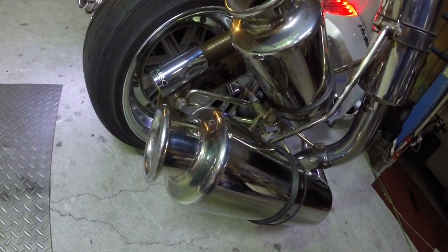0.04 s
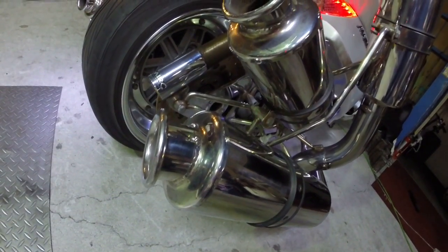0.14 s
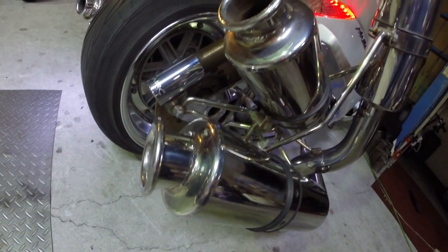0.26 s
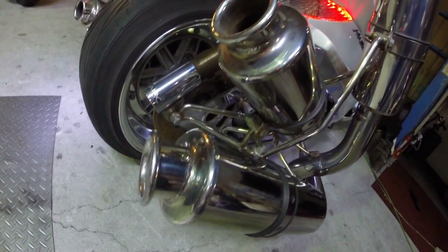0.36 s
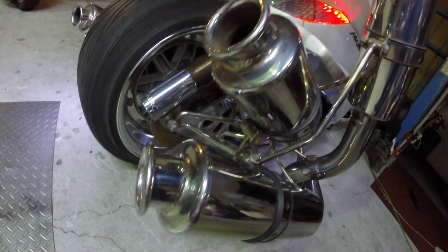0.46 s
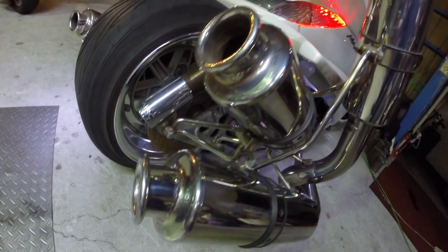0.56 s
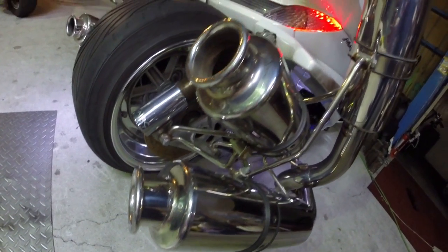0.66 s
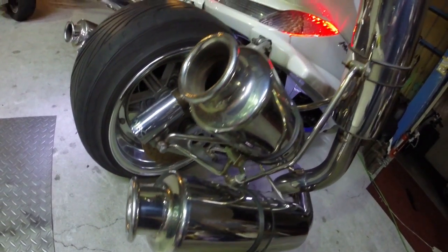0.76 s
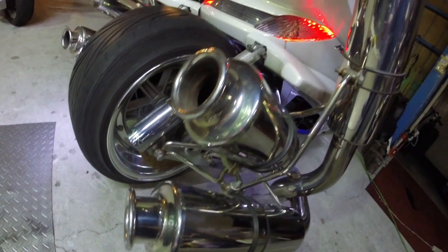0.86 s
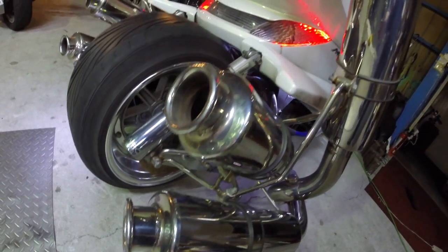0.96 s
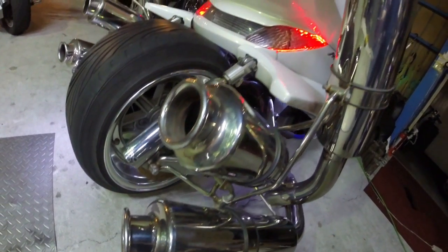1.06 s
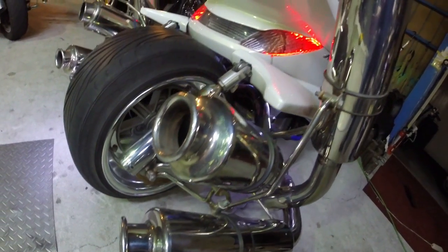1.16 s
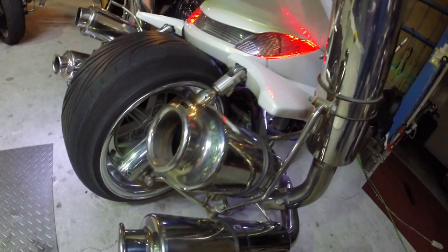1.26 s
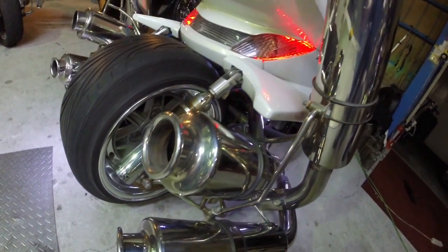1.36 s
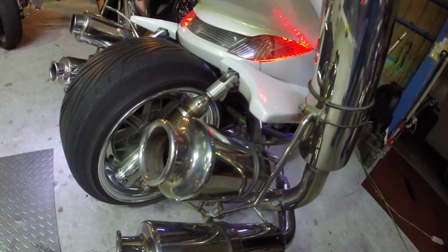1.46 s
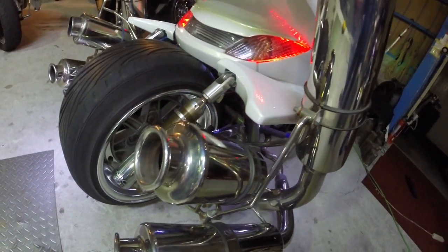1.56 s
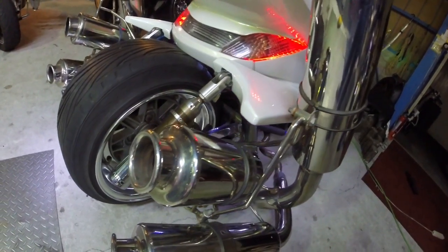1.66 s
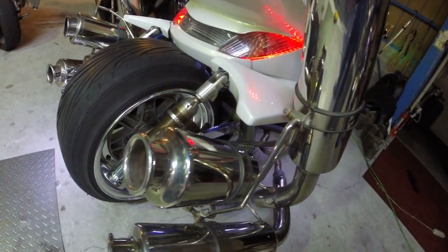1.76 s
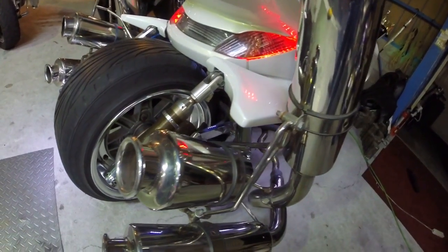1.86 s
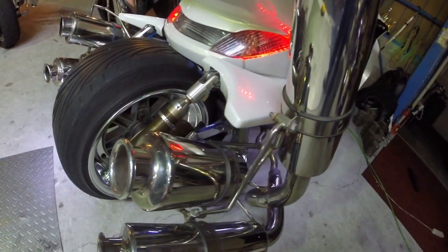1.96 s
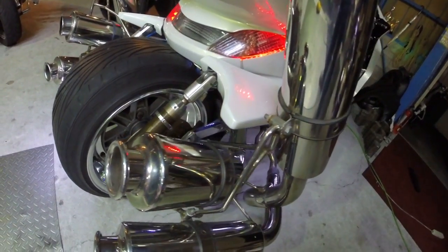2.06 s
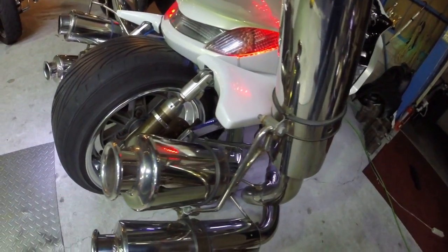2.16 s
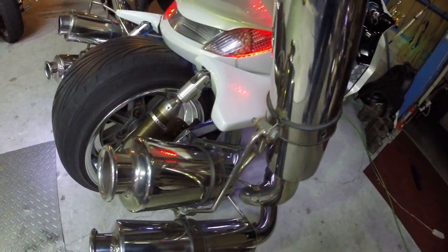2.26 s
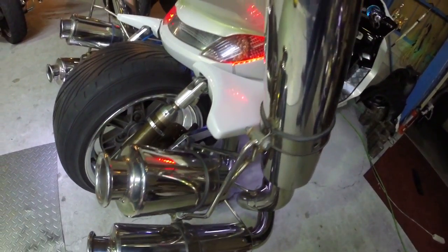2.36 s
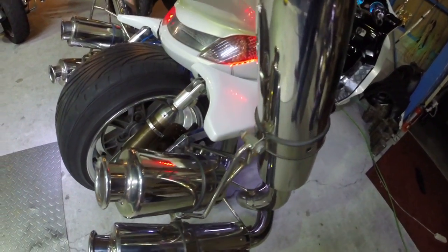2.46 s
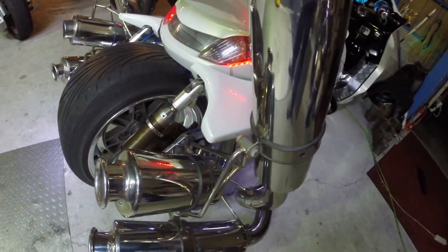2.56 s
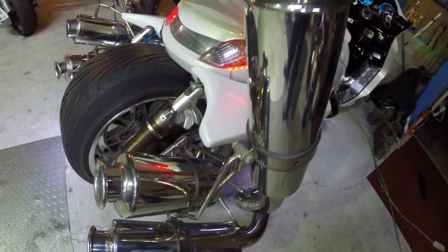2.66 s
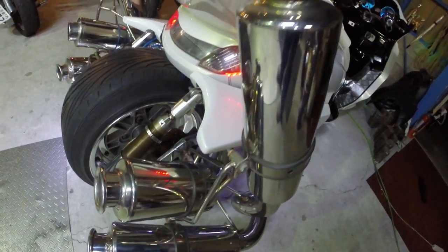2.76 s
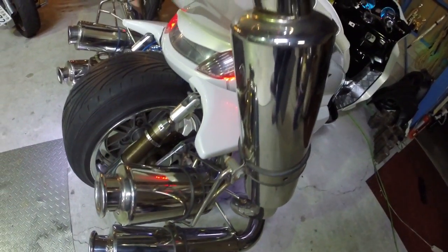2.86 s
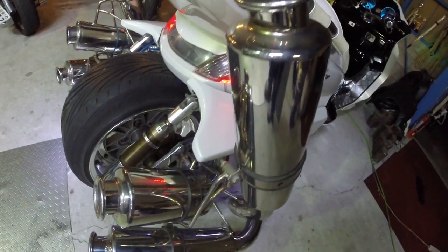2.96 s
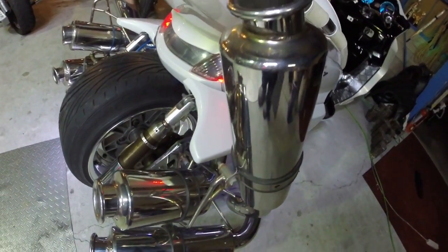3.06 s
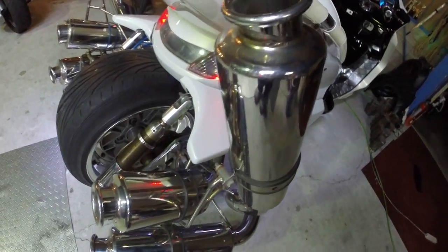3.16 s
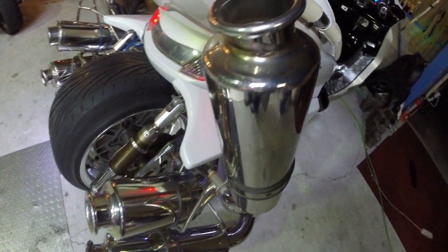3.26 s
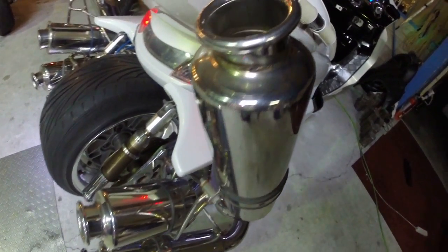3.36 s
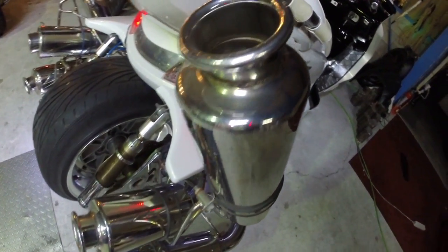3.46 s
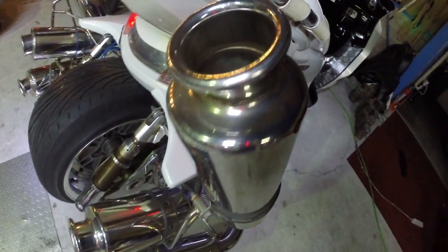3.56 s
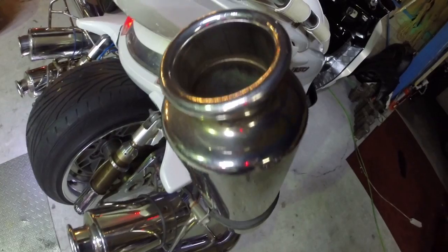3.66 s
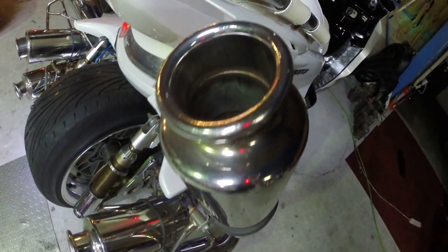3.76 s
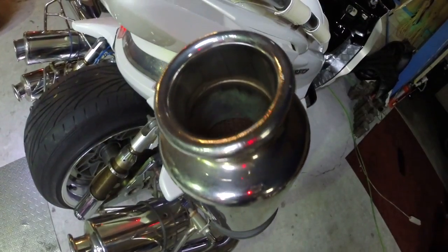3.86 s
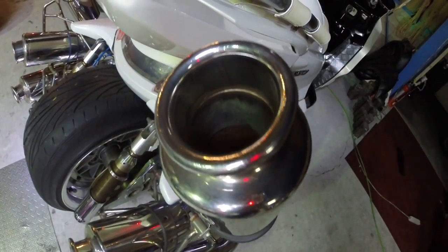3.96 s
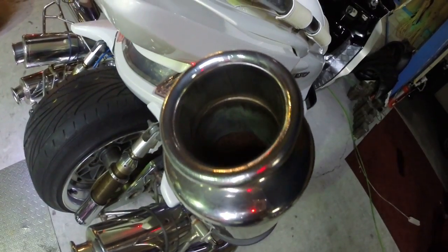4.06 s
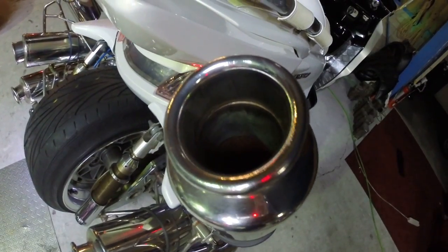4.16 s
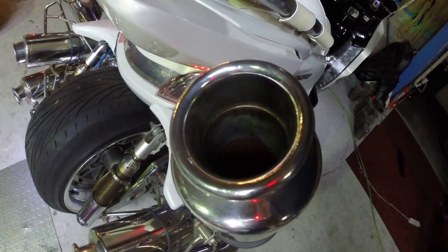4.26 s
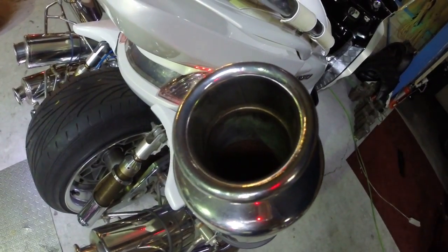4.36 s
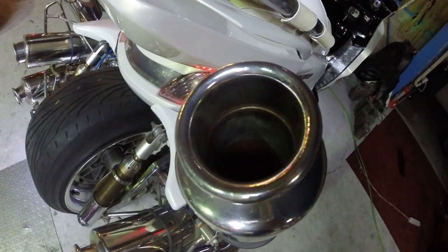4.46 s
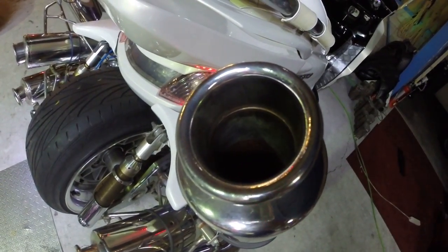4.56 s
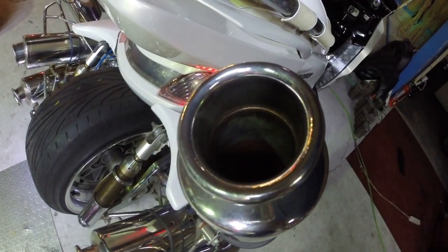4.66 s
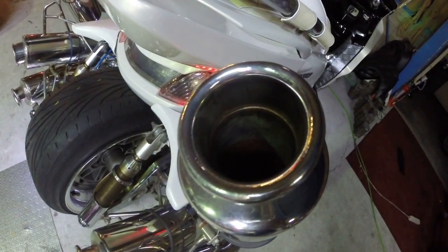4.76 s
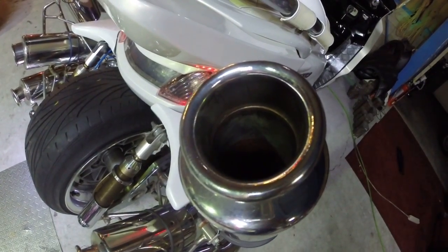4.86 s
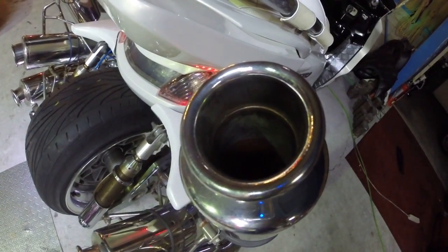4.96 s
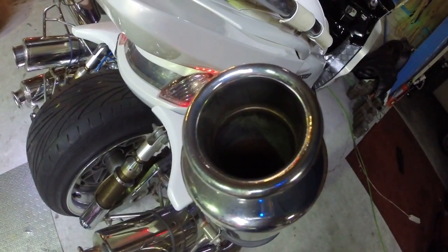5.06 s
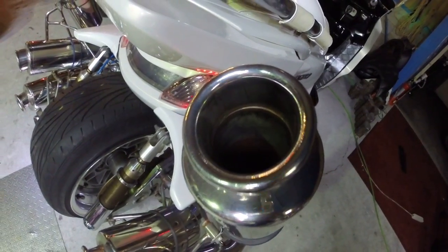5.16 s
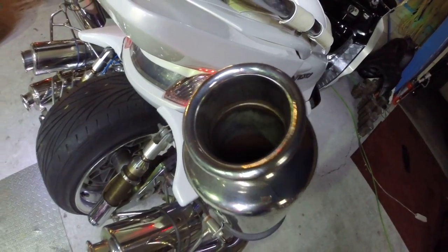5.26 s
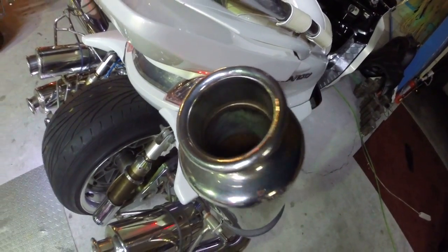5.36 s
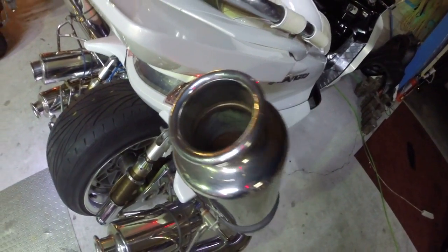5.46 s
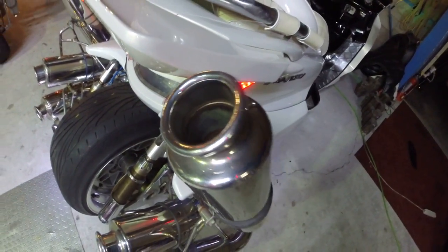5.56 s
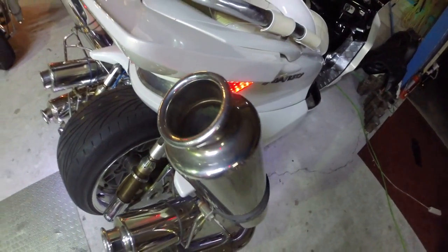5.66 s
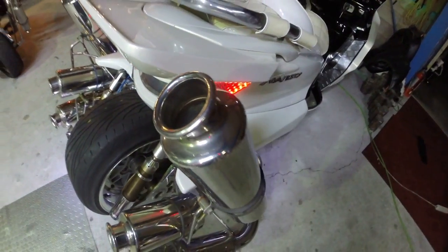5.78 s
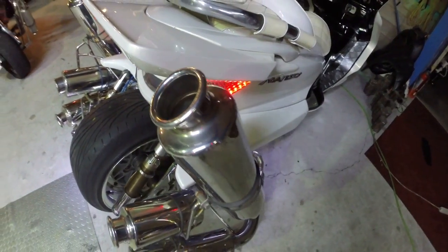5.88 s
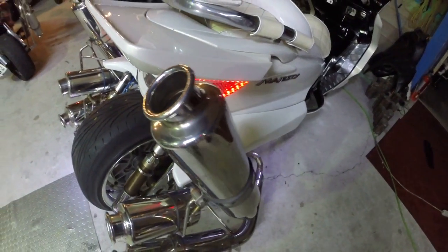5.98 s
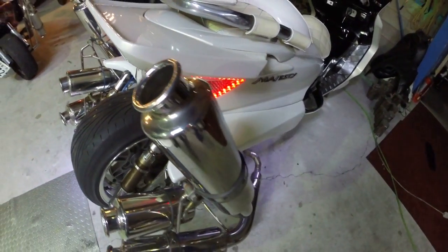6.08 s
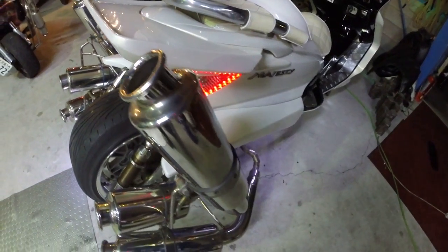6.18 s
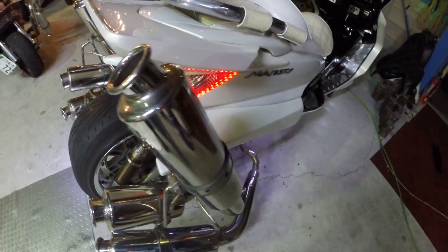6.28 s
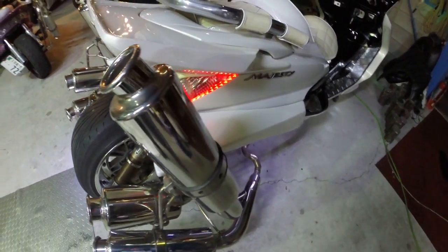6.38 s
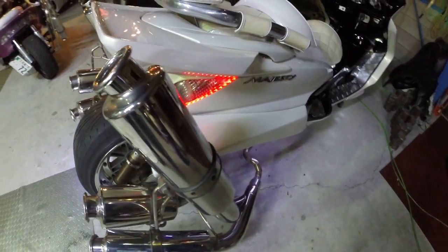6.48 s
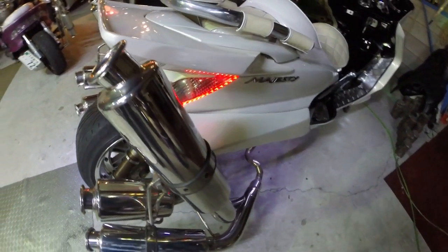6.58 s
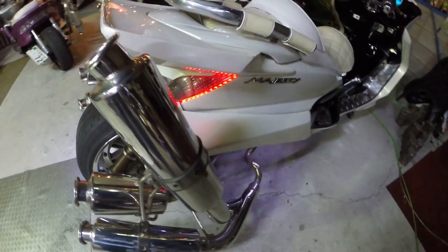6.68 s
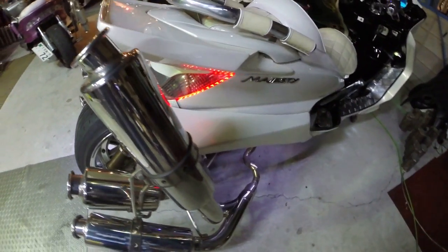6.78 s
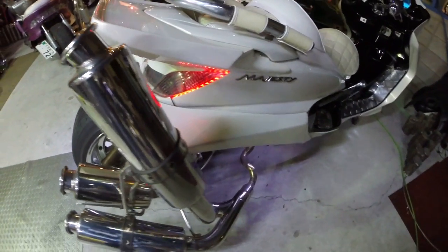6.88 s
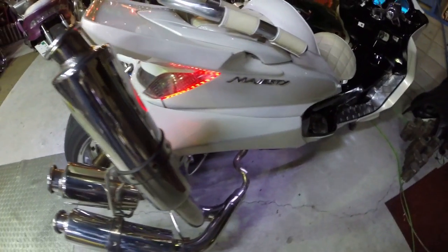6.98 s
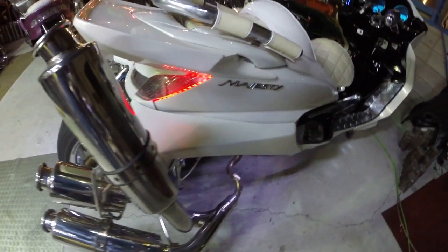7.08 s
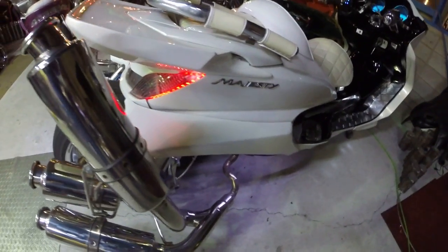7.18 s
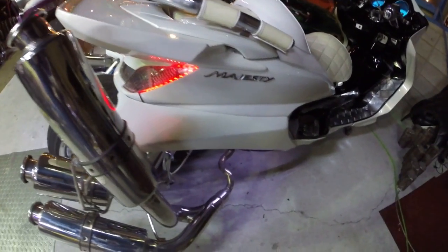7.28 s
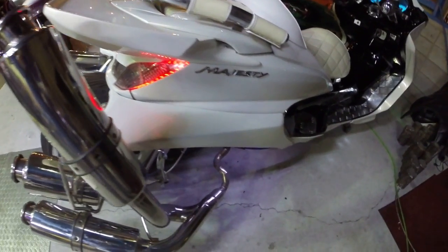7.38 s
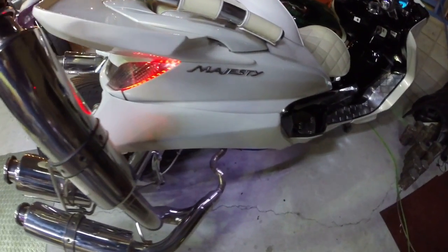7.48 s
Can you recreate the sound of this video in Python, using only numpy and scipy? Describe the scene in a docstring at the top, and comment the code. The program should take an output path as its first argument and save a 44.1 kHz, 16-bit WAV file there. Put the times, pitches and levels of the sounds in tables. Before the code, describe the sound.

Deep, quick, slightly uneven exhaust pulses from an idling scooter in a hard-floored workshop, heard by a handheld camera microphone. At first boomy and clattery, they become throaty and loud by the middle, with small bright spits of gas, then retreat. A low reverberant wash, thin airy hiss, faint high electronic whine and deep handling rumble lie beneath; one dry hollow knock comes late.

```python
"""A single-cylinder scooter idles in a workshop, clattering over a low wash, a hiss and a faint camera whine.
From the start each firing rings the exhaust pipe and silencer, and arrives again by a wall, unevenly strong.
The hand-held camera drifts towards the exhaust mouth: the bark grows until about 3.9 s, with sharp gas spits.
Then it moves away and the bark fades; at about 7.1 s something hollow knocks once near the camera.
Pushes and noise through resonances make all the sounds except the whine, which is a switched tone."""
import sys
import numpy as np
from scipy import signal
from scipy.fft import rfft, irfft
from scipy.io import wavfile
from scipy.ndimage import uniform_filter1d

SR = 44100
rng = np.random.default_rng(int(sys.argv[2]) if len(sys.argv) > 2 else 0)


def wrap_up_sound(samples):
    """Save the sound to the file named by the first command line argument, as 16-bit audio."""
    columns = np.atleast_2d(samples).T
    # keep every value between -1 and 1, then stretch to whole-number steps
    tamed = np.clip(columns, -1, 1)
    steps = np.round(tamed * 32767).astype(np.int16)
    wavfile.write(sys.argv[1], SR, steps)


N = 332073  # length in samples

# Idle speed, wandering a little: [t/s, speed/rpm]
SPEED = [(0, 1334.5), (.75, 1393.3), (1.65, 1359.1), (2.55, 1427.9), (3.0, 1446.9), (3.9, 1580.3),
         (4.05, 1479.5), (4.5, 1508.6), (5.05, 1512.3), (5.55, 1445.1), (5.9, 1308.8), (6.35, 1393.6),
         (7.15, 1397.0), (7.53, 1344.2)]
FIRST_FIRING_S = 0.018

# Exhaust resonances, level within each group: [f/Hz, width/Hz, level/dB, sign and size at the mouth]
# lowest modes of the long pipe
BOOM = [(74.1, 16.25, 2.21, -0.78), (101.26, 17.3, -4, -0.66)]
# silencer volume
THUD = [(106.93, 47.26, 1.44, 0.931), (135.55, 4.6, -15, -1.02)]
# upper pipe modes, beamed from the mouth
BARK = [(125.4, 3.5, -10.5, 0.37), (191.6, 27, -14.5, -1.18), (334.2, 47, 1.5, 0.85), (369.2, 29, -3, 1),
        (490, 140, -15.5, -0.96), (670, 42, -24, 0.91)]
# silencer cans
SHELL = [(218.3, 15.5, 0, 1), (313.4, 13.2, -2, 0.96), (387.4, 76.3, -5, 0.92), (426, 33, -16, -1.34)]
# hollow rings of three tail cans, each heard from its own side
HOLLOW = [(572, 25, 2.4, 0.87), (632, 9.2, 0.81, -1.96), (774, 39, -1, 0.71)]
# Time constant of each group's push, both rising and falling
BOOM_PUSH_S, THUD_PUSH_S, BARK_PUSH_S, SHELL_PUSH_S, HOLLOW_PUSH_S = 0.00055, 0.00071, 0.0052, 0.00028, 0.00012
VOLUME_DB, CANS_DB = -8, -22  # silencer volume and cans, counted from the lowest pipe modes

# Pulse travel, tail cans (counted from the lowest pipe modes), and the second arrival of each thump,
# unevenly strong (counted from the direct sound): [t/s, pulse travel/s,
# first, second and third tail can level/dB, second arrival level/dB, second arrival lag/s]
PLACE = [(.3, .0049, -34.5, -44, -50, -16, 0.029), (.9, 0.0049, -40, -34.5, -48, -18, 0.029),
         (1.9, 0.0036, -41, -34.5, -57, -11, .029), (2.5, 0.0024, -36, -34.5, -42, -32, 0.0277),
         (3.3, .00214, -47, -41, -34.5, -10.5, 0.023), (4.5, 0.0025, -55, -45, -38, -15.5, 0.023),
         (5.7, 0.0023, -52, -46, -39.5, -34, 0.0293), (6.4, 0.0022, -36, -40, -44, -12.5, .029),
         (7.3, 0.0031, -47, -50, -48, -13, 0.02775)]
# As the camera nears the mouth and leaves:
# [t/s, lowest pipe modes level/dB, upper modes level/dB, gas spit level/dB, clack level/dB]
NEARNESS = [(.1, 18.5, -42, -54, -52), (.5, 19, -30, -54, -49), (.9, 19, -5, -59, -47),
            (1.4, 19, -1, -57, -48), (2.1, 19, 4, -58, -51.5), (2.9, 18.5, 7.5, -61, -52.5),
            (3.45, 20, 10, -59, -55), (3.92, 23, 14, -53, -48.5), (4.6, 22.5, 12.5, -50, -52.5),
            (5.2, 22.5, 12.5, -49, -49.5), (5.6, 19.7, 8.5, -59, -50), (5.97, 16.5, 5, -60, -56.5),
            (6.6, 15.5, 3.5, -58, -57.5), (7.4, 13, .5, -63, -62)]
# Random spread, either way
FIRING_SCATTER_DB, SPIT_SCATTER_DB, CLACK_SCATTER_DB = 0.45, 4, 5.5

# Modes that each firing strikes in the engine cases: [f/Hz, width/Hz, level/dB]
CLACK = [(1550, 260, 0), (2570, 730, 2.5), (3264, 470, 0), (5030, 3400, -4.5)]
# Some hard clacks, each setting the level of one mode: [t/s, mode f/Hz, level/dB]
HARD_CLACKS = [(.022, 2600, -41.5), (.289, 2600, -42), (.289, 3300, -35.5), (.378, 3300, -37.5),
               (.465, 5000, -44), (.639, 2600, -45), (.726, 2600, -37), (.898, 3300, -42),
               (.985, 2600, -43.5), (1.333, 2600, -41), (1.509, 1530, -45), (1.597, 2600, -40),
               (1.947, 1530, -40.5), (2.121, 2600, -40), (2.629, 3300, -41), (2.881, 3300, -45),
               (3.372, 2600, -40), (3.452, 1530, -40.5), (3.53, 1530, -42), (3.917, 1530, -40),
               (3.917, 2600, -42.5), (4.075, 1530, -43), (4.635, 2600, -44), (4.875, 2600, -42),
               (5.033, 2600, -41), (5.192, 2600, -41), (5.354, 2600, -40), (5.437, 3300, -44),
               (5.518, 2600, -43), (5.686, 2600, -44)]

# Resonances of the engine cases, relative levels: [f/Hz, width/Hz, level/dB]
CASES = [(1146, 180, -7.5), (1533, 148, 1), (2625, 230, -1.5), (3316, 410, -3.5), (4250, 720, -8),
         (5867, 770, -6.5)]
# Smooth spectrum between those peaks, relative levels per Hz: [f/Hz, level/dB]
CASE_BED = [(250, -3), (500, -1.5), (900, -13.5), (2000, -8), (3500, -11.5), (5000, -23.5), (6500, -18),
            (8500, -26.5), (10800, -29.5), (13500, -33.5), (15000, -50)]
# Running clatter, before the swells lift it: [t/s, level/dB]
CLATTER = [(0, -48.5), (1.7, -48.5), (2.0, -49.5), (5.5, -50), (6.0, -52), (7.2, -50), (7.53, -50)]

# Some sharp gas spits, each setting the level of one firing's spit: [t/s, level/dB]
HARD_SPITS = [(3.688, -49), (3.995, -49), (4.156, -47), (4.477, -44), (4.635, -41.5), (4.715, -47),
              (4.875, -46.5), (5.112, -49.5)]

# The knock: [t/s, blow level/dB]
KNOCKS = [(7.0905, -5.5)]
# Resonances of the hollow thing knocked: [f/Hz, width/Hz, level/dB]
KNOCK_MODES = [(960, 80, -25), (1305, 170, 6.5), (1460, 100, -1), (1810, 170, -3), (2050, 130, 6.5),
               (2220, 170, -5), (2740, 180, 2.5), (3050, 130, -2), (3300, 100, -17), (4250, 400, -15),
               (5500, 1500, -18)]

# Airy hiss near the wheel: [t/s, level/dB]
AIR = [(0, -71.5), (1.3, -76), (2.8, -75), (4.0, -84), (5.7, -81), (7.53, -75.5)]
WHINE_HZ, WHINE_RATE_HZ, WHINE_START_S = 11430, 29.97, 0.0156  # tone, switching rate, first switch-on
# Bass wobbles of the hand-held camera: [t/s, level/dB, half length/s]
SWAYS = [(0.0, -12, 0.37), (1.55, -24, 0.38), (2.75, -19, .2), (3.63, -19, 0.12), (6.054, -19, 0.22),
         (6.957, -18, 0.39)]
SWAY_FLOOR_DB = -37
MIC_LOW_HZ, TOP_HZ = 121.8, 15050  # where the camera's bass and treble cuts begin


def undb(db):
    """Turn decibels into a gain."""
    return 10 ** (np.asarray(db) / 20)


def unit(x):
    """Scale to an average strength (rms) of 1."""
    return x / np.sqrt(np.mean(x ** 2))


def curve(rows):
    """Join rows of (time in s, value) by straight lines, one value per sample."""
    return np.interp(np.arange(N) / SR, *np.transpose(rows))


def nearest(values, wanted):
    """Index of the value nearest to each wanted one."""
    return np.abs(np.subtract.outer(wanted, values)).argmin(axis=1)


def ring(x, hz, width):
    """Pass a sound through one resonance, with gain 1 at its centre."""
    return signal.lfilter(*signal.iirpeak(hz, hz / width, SR), x)


def ringing_noise(hz, width):
    """Noise sent twice through one resonance, for steeper sides."""
    return ring(ring(rng.standard_normal(N), hz, width), hz, width)


def train(times, gains, rise_s, fall_s):
    """At each time, a swell that rises and dies away, with its peak near the given gain."""
    spikes = np.zeros(N)
    at = (np.asarray(times) * SR).astype(int)
    inside = (at >= 0) & (at < N)
    np.add.at(spikes, at[inside], np.broadcast_to(gains, at.shape)[inside])
    t = np.arange(SR // 10) / SR
    shape = (1 - np.exp(-t / rise_s)) * np.exp(-t / fall_s)
    return signal.fftconvolve(spikes, shape / shape.max())[:N]


def coloured(x, points, peaks):
    """Shape a sound by a smooth spectrum with resonances standing on it."""
    f = np.maximum(np.arange(N // 2 + 1) * SR / N, 1)
    hz, db = np.transpose(points)
    power = undb(2 * np.interp(np.log(f), np.log(hz), db, left=-80))
    for centre, width, peak_db in peaks:
        power = power + undb(2 * peak_db) / (1 + (2 * (f - centre) / width) ** 2) ** 2
    return irfft(rfft(x) * np.sqrt(power), N)


def walk(rate):
    """Random levels, `rate` new ones a second, joined by slopes; typical spread about 0.8."""
    hold = int(SR / rate)
    steps = np.repeat(rng.standard_normal(N // hold + 1), hold)
    return 0.95 * uniform_filter1d(steps, hold)[:N]


def firings():
    """Times in s at which the cylinder fires: a four-stroke fires once in every two turns of the crank."""
    t = np.arange(N) / SR
    cycles = np.cumsum(curve(SPEED)) / 120 / SR  # 60 s a minute, two turns a cycle
    cycles = cycles - np.interp(FIRST_FIRING_S, t, cycles)
    return np.interp(np.arange(int(cycles[-1]) + 1), cycles, t)


def exhaust(fire_s, bark_db, drive_db):
    """Gas let out at each firing pushes the pipe and cans into ringing; each thump arrives again by a wall."""
    at, *columns = np.transpose(PLACE)
    travel, *tail_db, again_db, again_lag = (np.interp(fire_s, at, c) for c in columns)
    # each firing arrives twice: straight, then a second time
    times = np.r_[fire_s + travel, fire_s + travel + again_lag]
    groups = [(BOOM, drive_db, BOOM_PUSH_S), (THUD, drive_db + VOLUME_DB, THUD_PUSH_S),
              (BARK, bark_db, BARK_PUSH_S), (SHELL, drive_db + CANS_DB, SHELL_PUSH_S)]
    groups += [([mode], drive_db + db, HOLLOW_PUSH_S) for mode, db in zip(HOLLOW, tail_db)]
    sound = 0
    for modes, level_db, push_s in groups:
        push = train(times, undb(np.r_[level_db, level_db + again_db]), push_s, push_s)
        for f, width, db, sign in modes:
            sound = sound + sign * undb(db) * ring(push, f, width)
    # thin out the slow push below the lowest pipe mode
    return signal.sosfilt(signal.butter(2, 40, "high", fs=SR, output="sos"), sound)


def clack(fire_s, clack_db):
    """Each firing jolts the engine cases; every blow shares itself out differently over their modes."""
    hz, width, mode_db = np.transpose(CLACK)
    scatter = 2 * rng.random((len(fire_s), len(CLACK))) - 1
    blow_db = clack_db[:, None] + mode_db + CLACK_SCATTER_DB * scatter
    at, struck_hz, hard_db = np.transpose(HARD_CLACKS)
    blow_db[nearest(fire_s, at), nearest(hz, struck_hz)] = hard_db
    sound = 0
    for f, w, db in zip(hz, width, blow_db.T):
        rattle = unit(ringing_noise(f, w))
        sound = sound + rattle * train(fire_s + 0.0043, undb(db), 0.00073, 0.0067)
    return sound


def cases(fire_s):
    """Grainy clatter in the case resonances swells at the firing, at a later valve tick and before the next."""
    grains = rng.standard_normal(N) * undb(1.2 * walk(300))
    tick_db = -10.5 + 3.8 * rng.standard_normal(len(fire_s))
    firing = train(fire_s + 0.0062, undb(-3), 0.001, 0.0094)
    tick = train(fire_s + 0.0334, undb(tick_db), 0.0008, 0.003)
    squeeze = train(fire_s[1:] - 0.026, undb(-16), 0.019, 0.03)
    clatter = unit(coloured(grains, CASE_BED, CASES)) * undb(curve(CLATTER))
    return clatter * (1 + firing + tick + squeeze)


def gas(fire_s, spit_db):
    """The opening valve lets a short bright spit out at the mouth, then a weaker tail and a late faint tick."""
    low = ringing_noise(10700, 1100)
    high = ringing_noise(13200, 2000)
    spit = train(fire_s + 0.005, undb(spit_db), 0.00055, 0.0021)
    tail = train(fire_s + 0.0094, undb(spit_db - 18), 0.0015, 0.006)
    tick = train(fire_s + 0.031, undb(-67.0), 0.0008, 0.006)
    return unit(low + undb(-3) * high) * (spit + tail + tick)


def knock():
    """One dry knock makes something hollow ring in many modes, with two weaker bounces just after."""
    s, db = np.transpose(KNOCKS)
    times = np.r_[s + 0.0006, s + 0.0018, s + 0.0052]
    blow = train(times, undb(np.r_[db, db - 5, db - 13]), 0.00003, 0.00004)
    sound = 0
    for k, (f, width, mode_db) in enumerate(KNOCK_MODES):
        sound = sound + (-1) ** k * undb(mode_db) * ring(blow, f, width)  # neighbours move oppositely
    return sound


def shop_wash():
    """The engine's low reverberant wash in the shop, made of steady noise in two broad resonances."""
    low = ring(rng.standard_normal(N), 95, 63)
    middle = ring(rng.standard_normal(N), 380, 190)
    return undb(-50.5) * unit(low + undb(-12.5) * middle)


def air_hiss():
    """The airy hiss near the wheel is noise in a high band whose level slowly changes."""
    return undb(curve(AIR)) * unit(ringing_noise(10100, 1600))


def whine():
    """The camera's electronics whine: a faint, slightly wavering tone switched on about thirty times a second."""
    t = np.arange(N) / SR
    switched_on = (t - WHINE_START_S) * WHINE_RATE_HZ % 1 < 0.45
    gate = uniform_filter1d(1.0 * switched_on, 90)  # soften the switching
    phase = 2 * np.pi * np.cumsum(WHINE_HZ + 25 * walk(30)) / SR
    return undb(-70.0 + 1.5 * walk(40)) * gate * np.sin(phase)


def camera_wobble():
    """Moving the hand-held camera gives a very deep rumble that swells and sinks."""
    rumble = unit(ringing_noise(24.4, 17))
    t = np.arange(N) / SR
    sway = undb(SWAY_FLOOR_DB)
    for s, db, half in SWAYS:
        sway = sway + undb(db) * np.exp(-((t - s) / half) ** 2)
    return sway * rumble


def scene():
    """Add up all the sources at the one microphone."""
    fire_s = firings()
    at, *columns = np.transpose(NEARNESS)
    boom_db, bark_db, spit_db, clack_db = (np.interp(fire_s, at, c) for c in columns)
    # no two firings are equally strong
    strength, spatter = 2 * rng.random((len(fire_s), 2)).T - 1
    uneven_db = FIRING_SCATTER_DB * strength
    spit_db = spit_db + SPIT_SCATTER_DB * spatter
    hard_s, hard_db = np.transpose(HARD_SPITS)
    spit_db[nearest(fire_s, hard_s)] = hard_db
    engine = exhaust(fire_s, bark_db + uneven_db, boom_db + uneven_db)
    engine = engine + clack(fire_s, clack_db) + cases(fire_s) + gas(fire_s, spit_db)
    background = shop_wash() + air_hiss() + whine() + camera_wobble()
    return (engine + knock() + background)[None]


def record(dry):
    """The camera thins the deep bass and cuts the top."""
    thin = signal.sosfilt(signal.butter(2, MIC_LOW_HZ, "high", fs=SR, output="sos"), dry)
    return signal.sosfilt(signal.ellip(10, 0.2, 70, TOP_HZ, fs=SR, output="sos"), thin)


dry = scene()
out = record(dry)
wrap_up_sound(out)
```